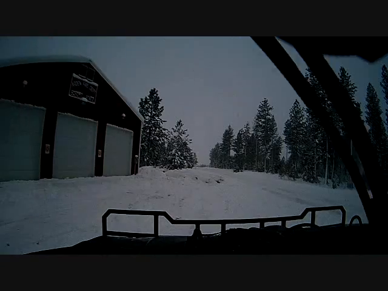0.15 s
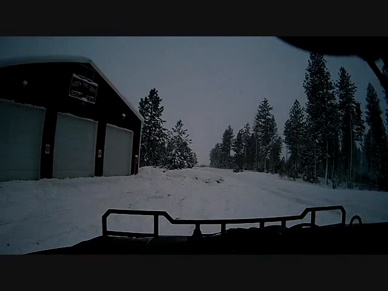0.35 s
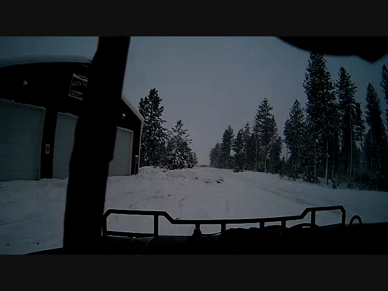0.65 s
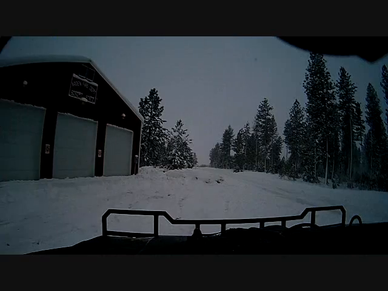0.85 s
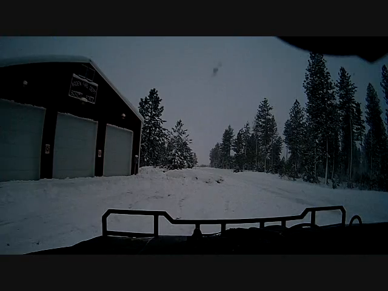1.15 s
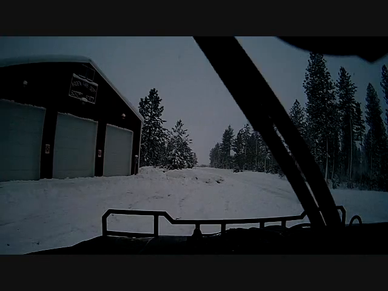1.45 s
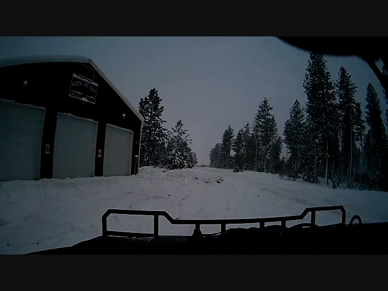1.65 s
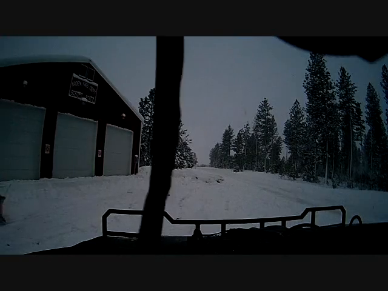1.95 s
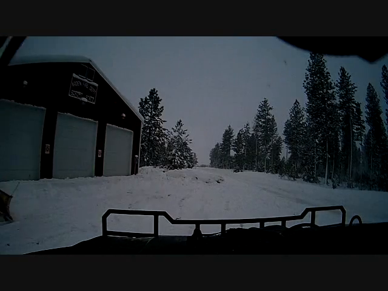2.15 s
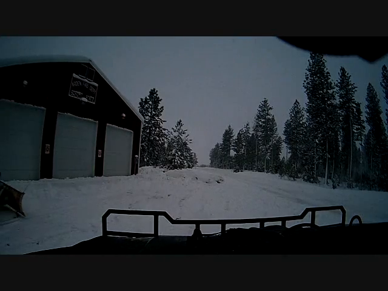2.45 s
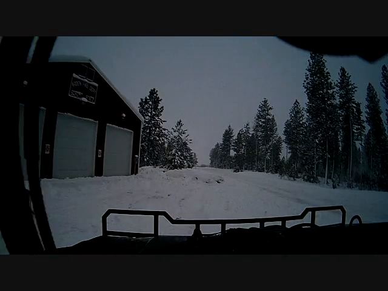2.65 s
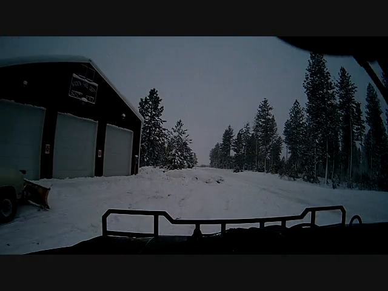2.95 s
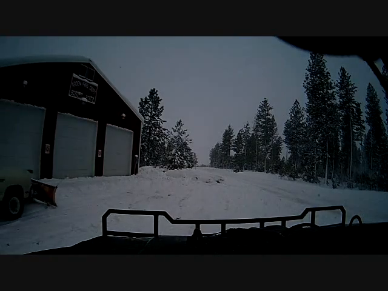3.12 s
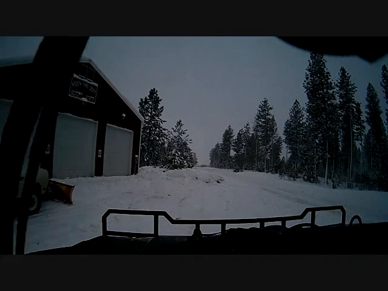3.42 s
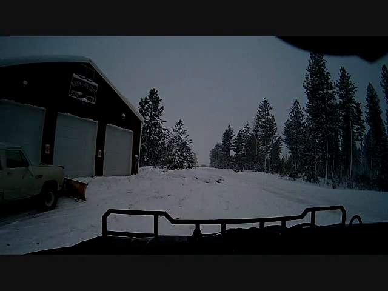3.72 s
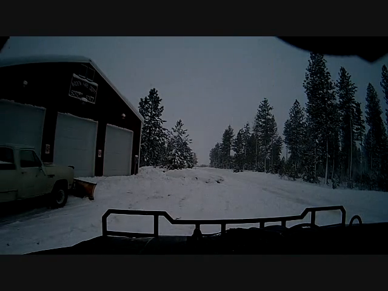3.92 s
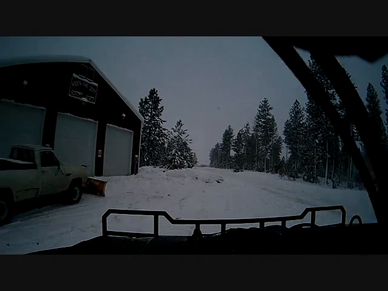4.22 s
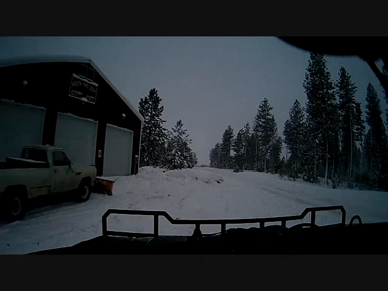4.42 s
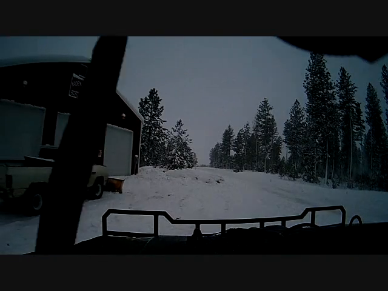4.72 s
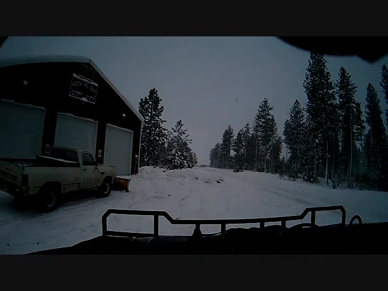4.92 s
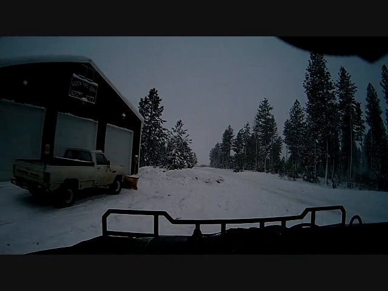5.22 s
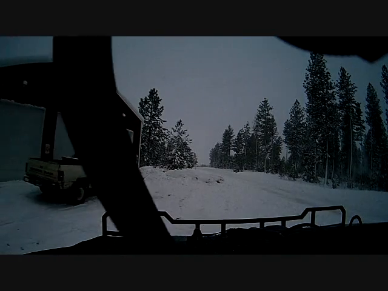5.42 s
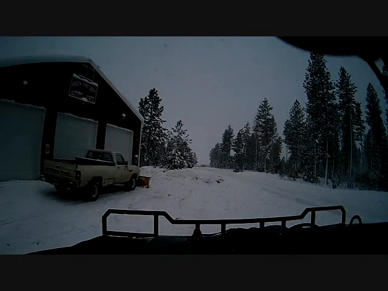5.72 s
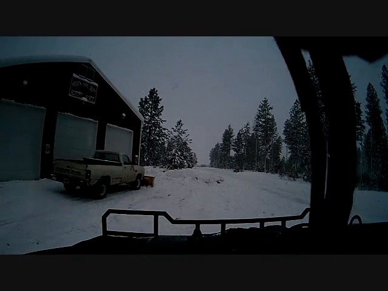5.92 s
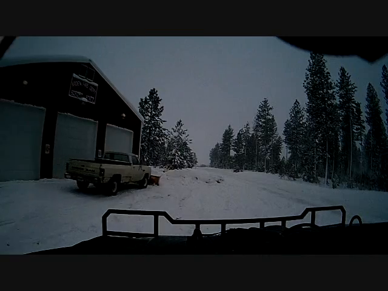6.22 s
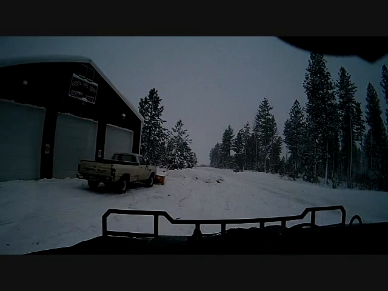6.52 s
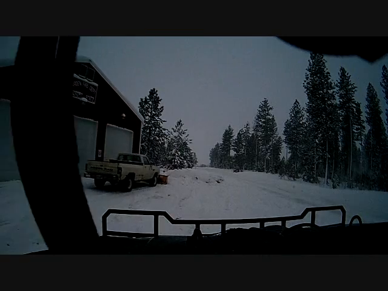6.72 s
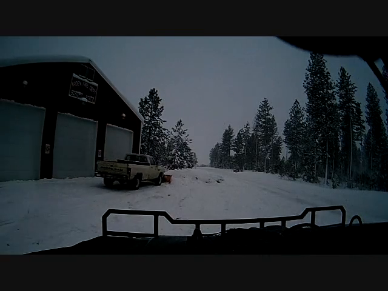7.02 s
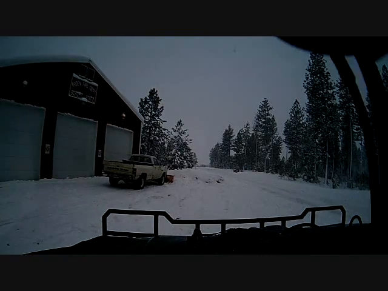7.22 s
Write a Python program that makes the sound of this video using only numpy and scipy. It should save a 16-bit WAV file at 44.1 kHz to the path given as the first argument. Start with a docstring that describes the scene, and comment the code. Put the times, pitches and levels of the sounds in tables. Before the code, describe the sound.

Short, booming wiper judders with plastic clacks repeat over a steady diesel idle and heater hiss, heard inside a closed cab.

```python
"""Juddering wiper in a diesel cab

A diesel machine idles in a snowy yard, heater blowing, while a pickup pulls past outside.
On each sweep the windscreen wiper sticks and slips: its knocks boom in the glass and cab,
and a loose plastic housing clacks after them. The hardest knocks overload the microphone."""
import sys
import numpy as np
from scipy import signal
from scipy.fft import rfft, irfft
from scipy.io import wavfile
from scipy.ndimage import uniform_filter1d

SR = 44100
rng = np.random.default_rng(int(sys.argv[2]) if len(sys.argv) > 2 else 0)


def to_wav(sig):
    """Store sig (one row per channel, or 1-D mono) as 16-bit WAV at the path in sys.argv[1].

    Samples outside -1..1 are clipped; the rate is SR.
    """
    pcm = np.clip(np.atleast_2d(sig), -1, 1) * 32767
    pcm = np.round(pcm).astype(np.int16)
    wavfile.write(sys.argv[1], SR, pcm.T)  # frames by channels


N = 324576
T = np.arange(N) / SR
RING_T = T[:SR // 8]  # time within one knock
FREQS = np.maximum(np.fft.rfftfreq(N, 1 / SR), 1)

# the clearer ticks (time [s], relative level [dB])
CLEAR_TICKS = [(0.0707, -26), (1.2976, -35.5), (2.6567, -43), (3.1178, -44), (3.8023, -45), (4.8723, -43),
               (6.0713, -44), (6.2572, -43)]
# the pickup's exhaust note (time [s], pitch [Hz], level [dB])
EXHAUST_NOTE = [(0, 41.6, -56), (.7, 48, -55), (1.3, 57.1, -35.5), (1.8, 67.9, -39), (2.3, 74.07, -33),
                (3.1, 76.76, -38), (3.6, 79, -39), (4.2, 80, -64), (7.36, 74.4, -49)]
# tone of the rushing air (frequency [Hz], relative level [dB])
AIR_SPECTRUM = [(200, -26), (1700, -2.5), (2500, 3), (3300, -3.5), (3650, -12.5), (3740, -31), (4600, -25),
                (6000, -25.5), (8000, -30), (15500, -31)]
# heater duct resonances (frequency [Hz], width [Hz], boost [dB])
DUCT_PEAKS = [(1876, 77, 8), (2110, 160, 4.5), (2498, 60, 5.5), (2790, 59, 5.5), (3300, 85, 2),
              (3610, 100, 5), (4100, 80, 12)]
# hums of fan and cab (pitch [Hz], level [dB])
CAB_HUMS = [(15.1, -37), (22.6, -50), (60.2, -46), (121, -41), (139, -43.5), (150, -50.5), (1040, -46.5)]
# pure engine tones (multiple of the firing rate, level [dB])
ENGINE_TONES = [(1, -41.5), (2, -46.5), (4, -43)]
# tone of the engine noise at the seat (frequency [Hz], relative level [dB])
ENGINE_SPECTRUM = [(20, -31), (50, -3.5), (95, -1.5), (140, -1), (185, -3.5), (235, -6), (290, -0.5),
                   (450, -1), (800, -8.5), (1200, -13.5), (1600, -13), (1760, -26.5), (3000, -34),
                   (6000, -56)]
# cab panel resonances (frequency [Hz], width [Hz], boost [dB])
PANEL_PEAKS = [(271.6, 22, 5.5), (410, 18, 4), (579.6, 19, 6), (640, 45, 0.5), (701, 20, 4.5),
               (768, 16, -3), (828, 39, -1), (883, 21, -5.5), (1003, 273, 6.5), (1284, 110, 5),
               (1433, 29, -16), (1633, 150, 3)]
# strength of each cylinder (relative level [dB])
CYLINDER_DB = np.array([-0.063, -0.02, -0.42, 0.15, -0.14, 0.37])
# ringing of the housing (pitch [Hz], relative level [dB], time to fade 60 dB [s])
HOUSING_MODES = [(1525, 3.5, 0.012), (2120, -3, 0.017), (2353, 5, 0.014), (2824, 7.5, 0.008),
                 (3590, 6, 0.0095), (4560, -14, 0.034), (5630, -17.5, 0.033), (6470, -5, 0.012),
                 (6800, -2, 0.011), (8020, -21, .016), (8000, -12, 0.015), (9020, -9, 0.016),
                 (12500, -27, .012)]
# ringing of windscreen and cab (pitch [Hz], relative level [dB], time to fade 60 dB [s])
GLASS_MODES = [(58, -16, 0.064), (103.5, -7, 0.08), (186, -18, 0.06), (234.5, -17, 0.092),
               (309, -18, 0.049), (406, -29, 0.086), (638, -15.5, 0.035), (838, -15.5, 0.029),
               (1404, -18.5, 0.021)]
# wiper judders, with relative levels (peak time [s], level [dB], slip gap [s], build-up [s],
# die-away [s], hardness, rattle level [dB], clack level [dB], clack brightness, bounce gap [s])
WIPER_JUDDERS = [(0.765, -7, 0.021, 0.035, .034, 4, -32, -22.5, 1, 0.0065),
                 (0.8204, -6.5, 0.014, .021, 0.03, 3, -27, -32, -9, .0095),
                 (2.1109, -4.5, .0182, 0.035, 0.035, 4.5, -28, -23, 6, 0.006),
                 (2.1825, 1, 0.013, 0.016, 0.014, 4, -29, -20, -3.5, 0.01),
                 (3.4548, -5, 0.018, .033, 0.029, 7, -24, -22, 0, 0.006),
                 (3.53, -3.5, .021, 0.033, 0.054, 5.5, -25, -21.5, -6, 0.0048),
                 (4.788, -6, .0165, 0.04, 0.029, 4, -30, -29.5, -7, 0.0077),
                 (6.1236, -2.5, 0.02, .024, 0.062, 1.5, -20.5, -23, -5.5, 0.0054)]


def gain(db):
    """Turn decibels into a multiplier."""
    return 10 ** (np.asarray(db) / 20)


def level(x, db):
    """Scale a sound to an average (rms) level."""
    return x * gain(db) / np.std(x)


def drift(rate_hz):
    """A smooth random wobble, roughly 1 in size."""
    steps = rng.standard_normal(2000)
    path = np.interp(T * rate_hz, np.arange(len(steps)), steps)
    return uniform_filter1d(path, int(SR / rate_hz / 2) + 1) * np.sqrt(2)


def cycles(hz):
    """Count the cycles done so far at a changing pitch."""
    return np.cumsum(hz) / SR


def tone(phase, db):
    """A pure tone; its phase is counted in cycles."""
    return level(np.sin(2 * np.pi * phase), db)


def colour(x, spectrum, peaks):
    """Shape a sound with a smooth spectrum plus resonant peaks."""
    hz, db = np.transpose(spectrum)
    gain_db = np.interp(np.log(FREQS), np.log(hz), db)
    for centre, width, boost in peaks:
        gain_db += boost / (1 + (2 * (FREQS - centre) / width) ** 2)
    return irfft(rfft(x) * gain(gain_db), N)


def band(x, low_hz, high_hz, order=1):
    """Keep what lies between two frequencies."""
    return signal.sosfilt(signal.butter(order, [low_hz, high_hz], "band", fs=SR, output="sos"), x)


def fade(t60):
    """Die away by 60 dB in t60 seconds."""
    return np.exp(-np.log(1000) * RING_T / t60)


def ring(modes, scatter_db, detune, tilt_db=0):
    """A struck object rings with fading tones, a little different each time; tilt favours high ones."""
    out = np.zeros(len(RING_T))
    for hz, db, t60 in modes:
        louder, sharper = rng.standard_normal(2)
        strength = gain(db + scatter_db * louder + tilt_db * np.log10(hz / 300))
        out += strength * fade(t60) * np.sin(2 * np.pi * hz * (1 + detune * sharper) * RING_T)
    return out


def add(out, s, sound):
    """Mix a sound in, starting at s seconds."""
    start = max(int(s * SR), 0)
    out[start:start + len(sound)] += sound[:N - start]


def whine():
    """A very faint, thin electrical whine."""
    return tone(15174 * T, db=-84.5)


def ticks(faint_count=70):
    """Tiny dry ticks: a few clear ones and a sprinkle of faint ones."""
    out = np.zeros(N)
    faint = [(when * N / SR, -54 + 9 * size ** 3) for when, size in rng.random((faint_count, 2))]
    snap = gain(8) * band(fade(0.0016), 1500, 18000)
    for s, db in list(CLEAR_TICKS) + faint:
        grit = band(rng.standard_normal(len(RING_T)), 3000, 11000) * fade(0.0029)
        add(out, s + 0.001, gain(db) * (snap + 0.6 * grit))
    return out


def pickup():
    """Only the lowest exhaust note gets into the closed cab; it rises as the truck gathers speed."""
    s, hz, db = np.transpose(EXHAUST_NOTE)
    return tone(cycles(np.interp(T, s, hz)), np.interp(T, s, db) + 2 * drift(6.88))


def heater():
    """The blower pushes air through its ducts; fan and cab hum along, wavering."""
    air = level(colour(rng.standard_normal(N), AIR_SPECTRUM, DUCT_PEAKS), -46.5 + 0.26 * drift(9.7))
    hums = sum(tone(cycles(hz * (1 + 0.01036 * drift(5))), db + 2 * drift(5.9)) for hz, db in CAB_HUMS)
    return air + hums


def engine(firing_hz=37.34, throb=0.21, clatter_db=-26.5):
    """Six uneven cylinders fire in turn, each making the cab panels clatter, over low pure tones."""
    firings = cycles(firing_hz * (1 + 0.00635 * drift(3)))
    stroke = firings.astype(int)
    strength = gain(CYLINDER_DB[stroke % 6] - 0.2 * rng.standard_normal(N)[stroke])
    bursts = strength * (1 + throb * np.exp(-(firings % 1) / 0.21))
    clatter = level(colour(bursts * rng.standard_normal(N), ENGINE_SPECTRUM, PANEL_PEAKS), clatter_db)
    tones = sum(tone(k * firings + rng.random(), db + 4.3 * drift(3.16)) for k, db in ENGINE_TONES)
    rumble = level(band(rng.standard_normal(N), 26, 74, order=2), -50)
    return clatter + tones + rumble


def housing_buzz(shake, contacts_per_s=1000, settle_s=0.0027):
    """While the glass shakes, the housing buzzes with a swarm of tiny contacts."""
    contacts = rng.random(N) < contacts_per_s / SR
    taps = contacts * rng.standard_normal(N) * gain(6 * rng.random(N))
    ringing = signal.fftconvolve(taps, ring(HOUSING_MODES, scatter_db=1, detune=0))[:N]
    buzz = level(band(taps, 2600, 3500), 0) + level(ringing, -4)
    # the buzz follows a moment behind the shaking
    hold = np.exp(-1 / (settle_s * SR))
    shake_power = signal.lfilter([1 - hold], [1, -hold], shake ** 2)
    return level(buzz, -32) * np.sqrt(shake_power)


def housing_bounces(blows, uneven=0.06):
    """Each blow on the housing becomes three hits, ever weaker and duller."""
    return [(s + k * bounce_s * (1 + uneven * late), db - 4.5 * k ** 2, brightness - 4.5 * k)
            for s, db, brightness, bounce_s in blows
            for k, late in enumerate(rng.standard_normal(3))]


def housing_clacks(hits, rise_s=0.00073):
    """The loose housing hits its mount: a gritty crack and a short ring, brighter on hard contact."""
    out = np.zeros(N)
    high_pass = signal.butter(2, 5500, "high", fs=SR, output="sos")
    for s, db, brightness in hits:
        crack = level(band(rng.standard_normal(len(RING_T)), 1500, 4300), 0) * fade(0.012)
        ringing = gain(0.2) * ring(HOUSING_MODES, scatter_db=3.5, detune=0.01)
        clack = (ringing + crack) * (1 - np.exp(-RING_T / rise_s))
        treble = signal.sosfiltfilt(high_pass, clack, padtype=None)
        add(out, s, gain(db) * (clack - treble + gain(0.91 * brightness) * treble))
    return out


def glass_knocks(blows, contact_s=0.0016, rebound_s=0.0017, cushion_hz=1900):
    """Shoved glass springs back and rings; harder knocks are brighter and rattle the cab more."""
    out = np.zeros(N)
    push = np.exp(-8 * (RING_T / contact_s - 1) ** 2)
    spring_back = np.exp(-8 * ((RING_T - rebound_s) / contact_s - 1) ** 2)
    for s, db, hardness in blows:
        burst = rng.standard_normal(len(RING_T)) * fade(0.077)
        cab_rattle = band(burst, 200, 1100, order=3) * np.sqrt(SR / 2 / 900)  # undo the filter's loss
        ringing = ring(GLASS_MODES, scatter_db=-0.4, detune=0.0021, tilt_db=0.81 * hardness)
        add(out, s - contact_s, gain(db + 1 - 0.17 * hardness) * (push - 0.47 * spring_back))
        add(out, s, -gain(db + 3) * ringing)
        add(out, s, gain(db - 16 + 0.5 * hardness) * cab_rattle)
    # the rubber blade cushions every blow
    return signal.sosfiltfilt(signal.butter(2, cushion_hz, fs=SR, output="sos"), out)


def wiper_judder(slips=6, scatter_db=1.9, clack_lag_s=0.0048):
    """The blade sticks and slips, swelling then dying away; lists the blows on glass and housing."""
    on_glass, on_housing = [], []
    for judder in WIPER_JUDDERS:
        peak_s, db, gap_s, build_s, die_s, hardness, rattle_db, clack_db, brightness, bounce_s = judder
        # slip number 0 is the peak
        for k, (late, louder, skip) in enumerate(rng.standard_normal((slips, 3)), start=-2):
            slope_s = die_s if k > 0 else build_s
            swell_db = -9 * abs(k * gap_s / slope_s) ** 1.65 + scatter_db * louder
            s = peak_s + k * gap_s + 0.0006 * k * late
            on_glass.append((s, db + swell_db, hardness))
            # the blade lands again between slips, lighter and harder
            landing_s = s + gap_s * (0.55 + 0.0855 * skip)
            on_glass.append((landing_s, db + swell_db - 7, hardness + 1))
            # the peak knock throws the housing against its mount; the others only rattle it, dully
            strike = (clack_db, brightness) if k == 0 else (rattle_db + 1.58 * swell_db, -11)
            on_housing.append((s + clack_lag_s, *strike, bounce_s))
    return on_glass, on_housing


def scene():
    """Everything as heard from just behind the windscreen, beside the housing."""
    background = engine() + heater() + pickup() + ticks() + whine()
    on_glass, on_housing = wiper_judder()
    glass = glass_knocks(on_glass)
    housing = housing_clacks(housing_bounces(on_housing)) + housing_buzz(glass)
    return (background + glass + housing)[None]


def record(dry, ceiling=0.53, top_hz=15850):
    """The microphone flattens the biggest peaks; filters remove any steady offset and the top treble."""
    clipped = dry / (1 + (dry / ceiling) ** 8) ** (1 / 8)
    centred = signal.sosfilt(signal.butter(1, 4, "high", fs=SR, output="sos"), clipped)
    return signal.sosfilt(signal.ellip(10, 0.1, 70, top_hz, fs=SR, output="sos"), centred)


dry = scene()
out = record(dry)
to_wav(out)
```